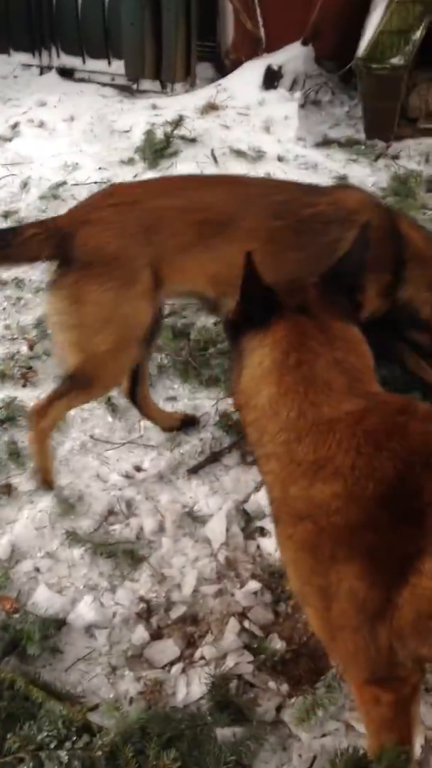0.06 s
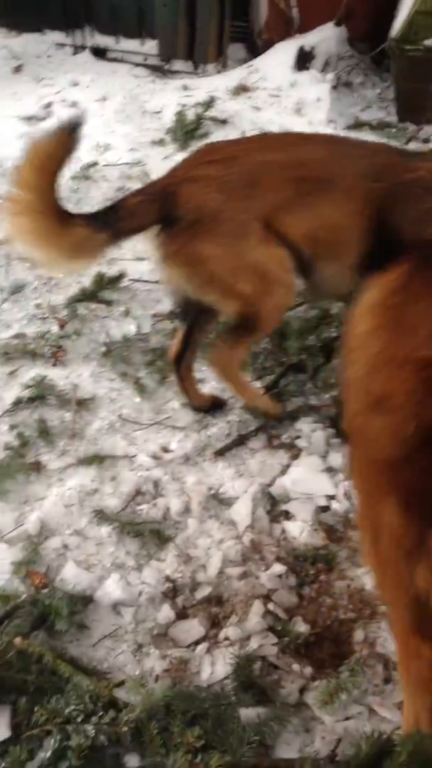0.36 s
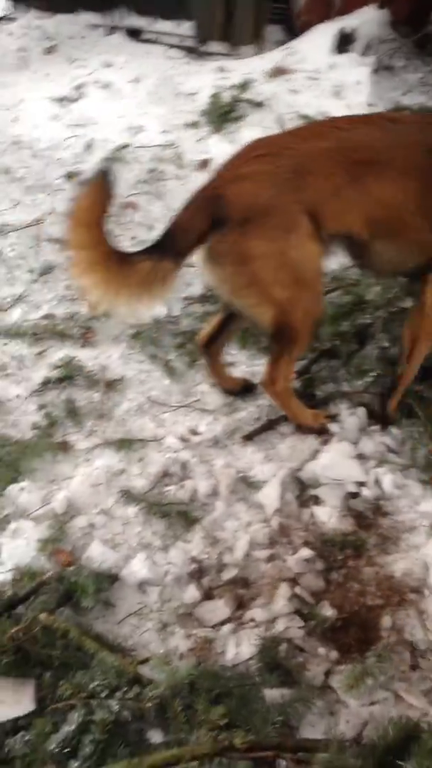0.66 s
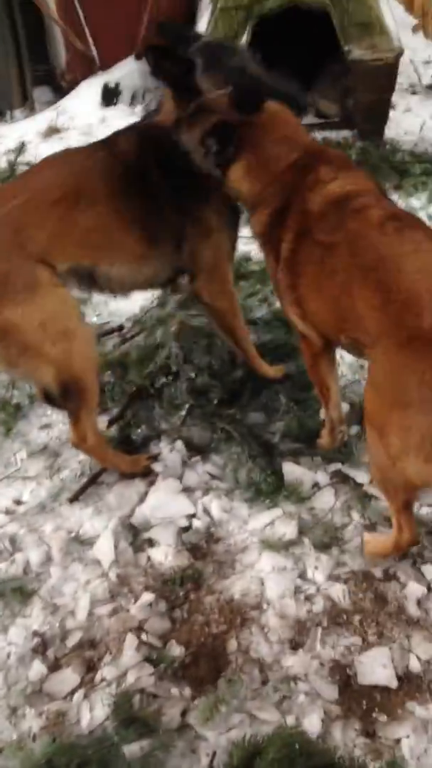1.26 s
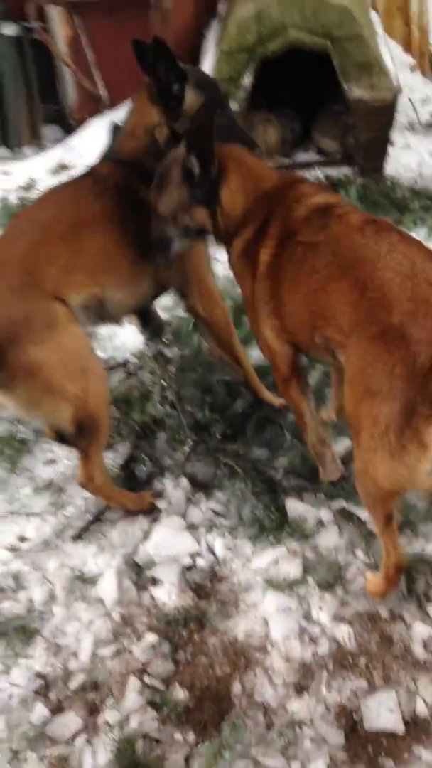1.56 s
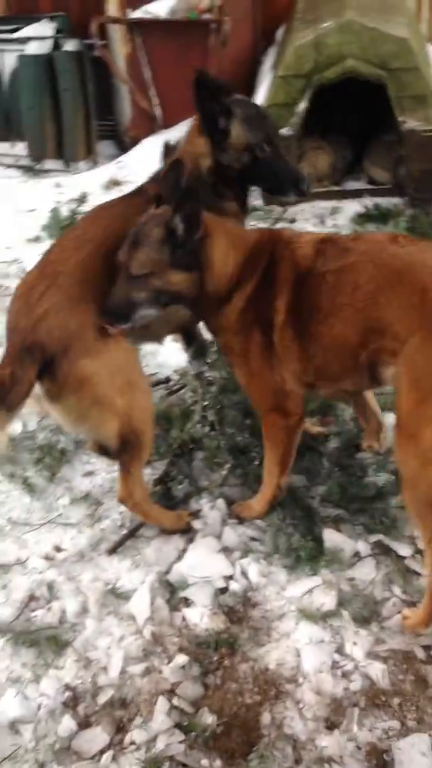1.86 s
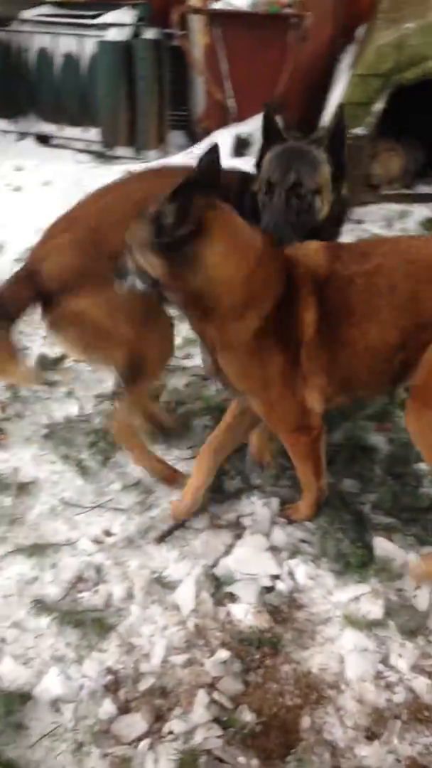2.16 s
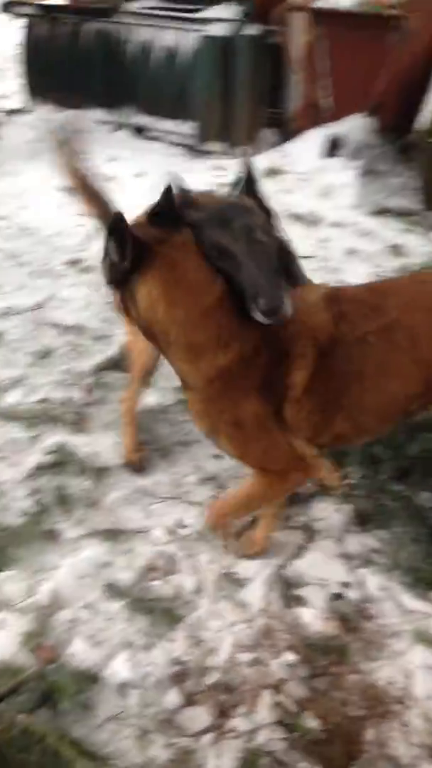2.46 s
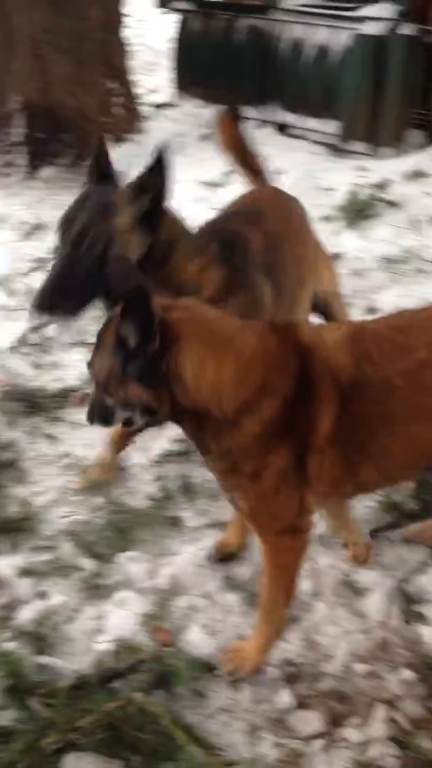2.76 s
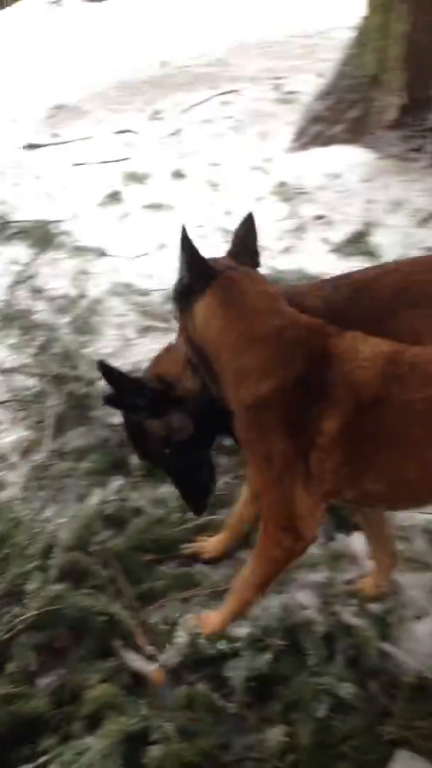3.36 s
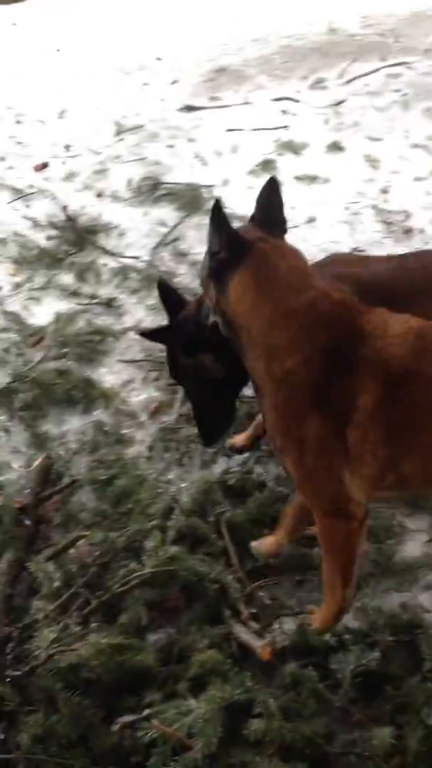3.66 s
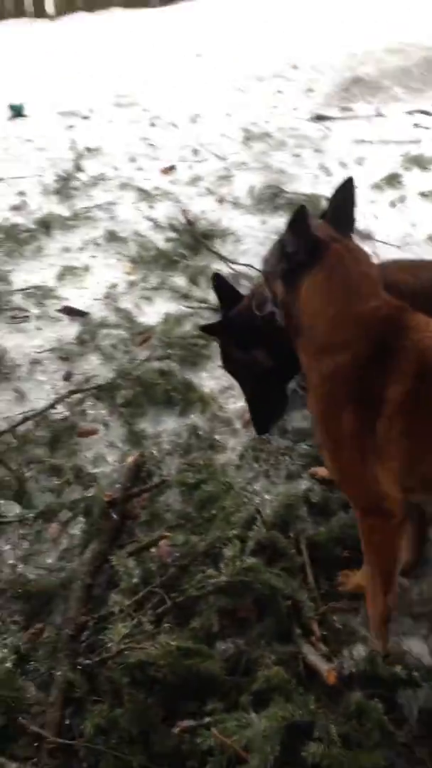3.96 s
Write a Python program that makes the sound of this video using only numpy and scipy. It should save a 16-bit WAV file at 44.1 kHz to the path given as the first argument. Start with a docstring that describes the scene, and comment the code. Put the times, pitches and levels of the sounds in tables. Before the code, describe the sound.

Paws crunch unevenly on crusty snow as two dogs jostle over fallen fir branches outdoors. Twigs click and snap, needles rustle between steps, and the close hand-held microphone picks up soft bumps and rumble.

```python
"""Two dogs jostling on crusty snow and fallen fir branches, outdoors in a yard, close to the microphone.
Each paw crushes the crust in a swell of tiny fractures, and heavy steps make the hollow slab resound.
Twigs and ice snap and click underfoot, needles rustle in between, and there is one faint squeak.
The moving hand-held microphone picks up soft bumps and rumble over a distant hush."""
import sys
import numpy as np
from scipy import signal
from scipy.io import wavfile

SR = 44100
rng = np.random.default_rng(int(sys.argv[2]) if len(sys.argv) > 2 else 0)


def pcm_store(signal):
    """Save signal as 16-bit PCM."""
    levels = np.round(np.clip(np.atleast_2d(signal), -1, 1) * 32767)
    wavfile.write(sys.argv[1], SR, levels.astype(np.int16).T)


N = 176400
TIME = np.arange(N) / SR
HZ = np.fft.rfftfreq(4096, 1 / SR) + 1
BODY_HZ, FIZZ_HZ = 1325, 5500  # low body lies below the first, icy fizz above the second


def amp(db):
    """Decibels to gain."""
    return 10 ** (np.asarray(db) / 20)


def unit(x):
    """Scales to rms 1."""
    return x / np.sqrt(np.mean(x ** 2) + 1e-20)


def spectrum(points):
    """A curve in dB over HZ, joined on a log-frequency axis."""
    hz, db = np.transpose(points)
    return np.interp(np.log(HZ), np.log(hz), db)


def fader(points):
    """A level curve as gain over time."""
    return amp(np.interp(TIME, *np.transpose(points)))


def add(mix, start, sound):
    """Mixes a sound in at a time in seconds."""
    part = mix[max(round(start * SR), 0):][:len(sound)]
    part += sound[:len(part)]


def colour(x, db):
    """Minimum-phase filter with the given gain curve."""
    log_gain = np.log(amp(np.r_[db, db[-2:0:-1]]))
    taps = np.fft.ifft(np.exp(np.conj(signal.hilbert(log_gain)))).real
    return signal.fftconvolve(x, taps[:len(HZ)])[:len(x)]


def above(hz):
    """Soft step from 0 to 1 around a frequency."""
    return 1 / (1 + (hz / HZ) ** 4)


def wander(step_s, db):
    """A gain that glides to a new random value every step."""
    knots = np.arange(0, N / SR + step_s, step_s)
    return amp(db * np.interp(TIME, knots, rng.standard_normal(N)[:len(knots)]))


# Tone of the open air, far off: f/Hz, relative level/dB
HUSH_TONE = [(20, -19), (130, 3), (400, 1.5), (2000, -16.5), (15000, -28.5)]
def distant_hush():
    """Steady outdoor hush, well behind the dogs."""
    return amp(-59) * unit(colour(rng.standard_normal(N), spectrum(HUSH_TONE)))


# Tone of the handling noise: f/Hz, relative level/dB
RUMBLE_TONE = [(24, -31), (55, -1), (100, 2.5), (170, -3.5), (900, -52.5)]
# Handling noise, right at the microphone: t/s, level/dB
RUMBLE_FADER = [(0, -56.5), (1.12, -59), (1.4, -71), (1.5, -49), (1.63, -66), (1.8, -51), (1.93, -46.5),
                (2.04, -67), (2.28, -46.5), (2.7, -60.5)]
def handling_rumble():
    """The microphone rumbles as it moves in the hand."""
    return fader(RUMBLE_FADER) * unit(colour(rng.standard_normal(N), spectrum(RUMBLE_TONE)))


def fractures(per_s, spread_db, low_hz, high_hz=11130, pitches=40, ring_cycles=1.53):
    """Random tiny fractures of uneven size, each a chip ringing for a few cycles."""
    t = TIME[:1024]
    strikes = amp(spread_db * np.minimum(rng.exponential(1, N), 4))
    strikes *= rng.random(N) < per_s / SR
    strikes *= rng.choice([-1, 1], N)
    pitch_index, out = rng.integers(0, pitches, N), np.zeros(N)
    for k, hz in enumerate(np.geomspace(low_hz, high_hz, pitches)):
        chip = np.sin(2 * np.pi * hz * t) * np.exp(-t / (0.000074 + ring_cycles / hz))
        out += signal.oaconvolve(strikes * (pitch_index == k), np.sqrt(hz) * unit(chip))[:N]
    return unit(out)


# Tone of snow crust at close range, shared by the rustle: f/Hz, relative level/dB
CRUST_TONE = [(100, -5), (350, 3.5), (1400, 1.5), (3300, -1), (4800, -.5), (15000, -6.5)]
# Paws crushing or scuffing the crust, close by: t/s, rise/s, fall/s, relative level/dB, body/dB, fizz/dB
PAW_STEPS = [ (0.094, 0.011, 0.11, -59, -10, 1.5), (0.383, 0.01, 0.026, -42.5, -7, 0.5),
             (.409, 0.0048, 0.061, -43.5, 0, -4), (.436, 0.0021, 0.07, -42.5, -5, -5),
             (0.503, 0.0094, 0.041, -42.5, -15, -15), (0.874, 0.0081, 0.19, -59, -27, 2.5),
             (1.073, .017, 0.051, -43, -8.5, -4.5), (1.115, 0.012, 0.051, -47, -17, -13),
             (1.205, .018, 0.037, -42, -13.5, -1), (1.254, 0.016, 0.14, -48.5, -24, -2.5),
             (1.328, 0.034, 0.083, -42, -10, -9), (1.772, 0.013, 0.011, -47, -17, -10),
             (1.839, 0.012, 0.054, -49.5, -10, 5.5), (2.148, 0.089, 0.15, -49.5, -4, -6.5),
             (2.282, 0.031, 0.083, -40.5, -3.5, 1.5), (2.33, 0.0067, 0.16, -42, 0, -0.5),
             (2.369, 0.0072, 0.014, -32.5, -4.5, -6), (2.683, 0.0045, 0.015, -43.5, -36, -7.5),
             (2.714, 0.0037, 0.029, -48.5, -5, -5), (2.81, 0.0053, 0.029, -41.5, -10.5, -0.5),
             (2.918, 0.0083, 0.049, -44.5, 0, -0.5), (2.941, 0.005, 0.23, -56.5, 9, -3),
             (3.161, .011, 0.034, -38.5, -10.5, -14), (3.199, 0.0083, 0.019, -38.5, -17.5, -19),
             (3.248, 0.009, 0.051, -38.5, -9, -10.5), (3.321, 0.014, 0.15, -43, -1.5, -2.5),
             (3.418, 0.031, 0.077, -32, -.5, -5.5), (3.714, 0.013, 0.052, -41, -3.5, -17),
             (3.746, 0.019, 0.088, -42.5, 1, 3.5), (3.832, 0.0079, 0.086, -45.5, 4, -9),
             (3.933, 0.0028, 0.16, -48.5, -0.5, -30)]
def paw_crunches(drop_per_fall_db=23.5):
    """Under each paw a jerky shower of fractures and powdery hiss sets in, swells and dies."""
    shower = unit(fractures(per_s=2500, spread_db=2, low_hz=280) + rng.standard_normal(N))
    out = np.zeros(N)
    for start, rise, fall, db, body_db, fizz_db in PAW_STEPS:
        span = (TIME > start) & (TIME < start + rise + 2 * fall)
        t = TIME[span] - start
        swell = np.minimum(t / rise, 1) ** 0.55
        drop_db = drop_per_fall_db * (np.maximum(t - rise, 0) / fall) ** 1.16
        tone = spectrum(CRUST_TONE) + body_db * (1 - above(BODY_HZ)) + fizz_db * above(FIZZ_HZ)
        add(out, start, colour(shower[span] * swell * amp(db - drop_db), tone))
    return amp(8.5) * out


# Needles and loose snow stirring around the dogs: t/s, level/dB
RUSTLE_FADER = [(.2, -67), (.3, -58), (.8, -56), (1.18, -60.5), (1.45, -48.5), (1.56, -60), (1.72, -53),
                (1.95, -59), (2.63, -54), (3.1, -55.5), (3.62, -45), (3.69, -55), (4, -52.5)]
def needle_rustle(body_db=-4, tick_db=-4):
    """Fir needles and loose snow swish softly in clumps, with scattered small ticks."""
    stir = rng.standard_normal(N) + amp(tick_db) * fractures(per_s=330, spread_db=4.5, low_hz=BODY_HZ)
    stir *= wander(step_s=0.026, db=3)
    tone = spectrum(CRUST_TONE) + body_db * (1 - above(BODY_HZ))
    return fader(RUSTLE_FADER) * unit(colour(stir, tone))


# Thin twigs and ice chips, close by: t/s, peak level/dB, ring f/Hz
TWIG_CLICKS = [ (0.4016, -26.5, 4300), (0.5144, -35, 4000), (0.521, -33, 4480), (.8052, -31, 4930),
               (1.6165, -39.5, 4160), (1.8581, -37, 11000), (2.4959, -27.5, 2660), (2.6958, -41, 1930),
               (2.722, -33, 6040), (2.8096, -37, 6760), (3.038, -33.5, 2860), (3.262, -20, 4200),
               (3.272, -26, 3060), (3.2782, -29, 4060), (3.5124, -32, 2330), (3.9356, -30.5, 2150)]
def twig_clicks(ring_s=0.00027, grit_db=-12.5):
    """A thin twig or chip of ice gives at once: a tiny burst and a short ring at its own pitch."""
    out, t = np.zeros(N), TIME[:len(HZ)]
    envelope = t / ring_s * np.exp(1 - t / ring_s)
    for start, db, ring_hz in TWIG_CLICKS:
        ring = np.sin(2 * np.pi * ring_hz * t)
        grit = amp(grit_db) * rng.standard_normal(len(t))
        add(out, start, amp(db) * envelope * (ring + grit))
    return out


# Tone of a break at close range: f/Hz, relative level/dB
SNAP_TONE = [(150, -4), (900, 2), (6500, -2), (15000, -24.5)]
# Twigs and ice breaking underfoot: t/s, level/dB, length/s, ring f/Hz, fizz/dB
TWIG_SNAPS = [(0.4352, -29, 0.0026, 970, 8), (0.7127, -28, 0.0036, 1130, 4.5),
              (2.2334, -33.5, 0.0023, 10100, 47), (2.377, -31.5, .002, 2420, 7),
              (3.8615, -28.5, .002, 940, -32), (3.9676, -27.5, 0.0011, 4550, 9.5)]
def twig_snaps(cutoff_s=0.00013, splinter_s=0.0054):
    """A break tears for a few milliseconds, splinters and rings one heavily damped resonance."""
    out, t = np.zeros(N), TIME[:len(HZ)]
    for start, db, length, ring_hz, fizz_db in TWIG_SNAPS:
        tear, splinters = rng.standard_normal((2, len(t)))
        tear *= np.exp(-np.maximum(t - length, 0) / cutoff_s - t / length)
        splinters *= amp(-7.5) * np.exp(-t / splinter_s)
        crack = unit(colour(tear + splinters, spectrum(SNAP_TONE) + fizz_db * above(FIZZ_HZ)))
        ring = np.sin(2 * np.pi * ring_hz * t) * np.exp(-t / (length / 2 + 0.00018))
        gain = amp(db) * np.sqrt(length / t[-1])  # the level holds over the break's own length
        add(out, start, gain * (crack + amp(-4) * unit(ring)))
    return out


def resonance(hz, half_width_octaves=0.26):
    """Gain curve of one broad resonance."""
    return 1 / (1 + (np.log2(HZ / hz) / half_width_octaves) ** 2)


# Heavy paws on hollow crust, close by: peak t/s, half-length/s, level/dB, ring f/Hz
HEAVY_STEPS = [(0.436, 0.0085, -41.5, 690), (1.358, 0.023, -46.5, 280), (2.347, 0.046, -42, 350),
               (3.449, 0.021, -36.5, 493)]
def hollow_crust(overtone_ratio=3.14, overtone_db=-19):
    """The slab of crust under a heavy step resounds in a broad low resonance and its overtone."""
    out = np.zeros(N)
    for peak_s, half_length, db, ring_hz in HEAVY_STEPS:
        slab = resonance(ring_hz) + amp(overtone_db) * resonance(ring_hz * overtone_ratio)
        ring = unit(colour(rng.standard_normal(N), 20 * np.log10(slab)))
        out += amp(db) * np.exp(-((TIME - peak_s) / half_length) ** 2) * ring
    return out


# Paw thuds nearby and knocks on the microphone itself: t/s, peak level/dB, f/Hz
THUDS = [(1.145, -35.5, 75.4), (1.48, -35, 56.6), (1.737, -32.5, 91.5), (1.797, -28.5, 98),
         (2.128, -31, 100), (2.156, -35.5, 119), (2.299, -32, 162), (2.452, -38, 98), (2.51, -36, 198)]
def soft_thuds():
    """Each thud or knock is one low pressure pulse with a shallow dip on either side."""
    out = np.zeros(N)
    for peak_s, db, hz in THUDS:
        phase_squared = (np.pi * hz * (TIME - peak_s)) ** 2
        out += amp(db) * (1 - 3 * phase_squared) / (1 + phase_squared) ** 3
    return out


# A small squeak among the steps: peak t/s, half-length/s, peak level/dB, f/Hz, glide/(Hz per s)
SMALL_SQUEAK = (3.054, .004, -43, 1470, 15000)
def squeak():
    """One brief, faint squeak that rises in pitch."""
    peak_s, half_length, db, hz, glide = SMALL_SQUEAK
    t = TIME - peak_s
    return amp(db) * np.exp(-(t / half_length) ** 2) * np.sin(2 * np.pi * (hz + glide * t / 2) * t)


def yard_scatter(x, t60_s=0.093, build_s=0.04):
    """Weak, dull reflections come back to the microphone from fence, sheds and trees."""
    t = TIME[:SR // 2]
    envelope = np.minimum(t / build_s, 1) * np.exp(-np.log(1000) * t / t60_s)
    tail = colour(rng.standard_normal(len(t)) * envelope, -6 * above(hz=4970))
    return amp(-24.5) * signal.fftconvolve(x, tail / np.linalg.norm(tail))[:N]


def scene():
    """Paws, twigs and needles close up in the yard, on one hand-held microphone with its own noises."""
    ground = paw_crunches() + hollow_crust() + twig_snaps() + twig_clicks() + squeak() + needle_rustle()
    return (ground + yard_scatter(ground) + handling_rumble() + soft_thuds() + distant_hush())[None]


def record(dry):
    """The recorder's band limit cuts off the top treble."""
    edge_hz = 15300
    taps = signal.firwin(401, edge_hz, window=("kaiser", 8), fs=SR)
    return signal.oaconvolve(dry, taps[None], "same")


dry = scene()
out = record(dry)
pcm_store(out)
```